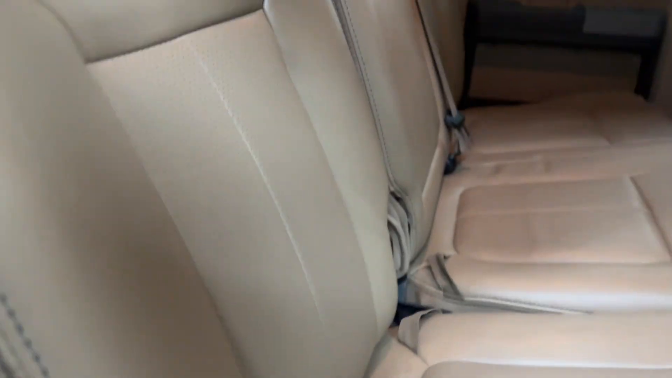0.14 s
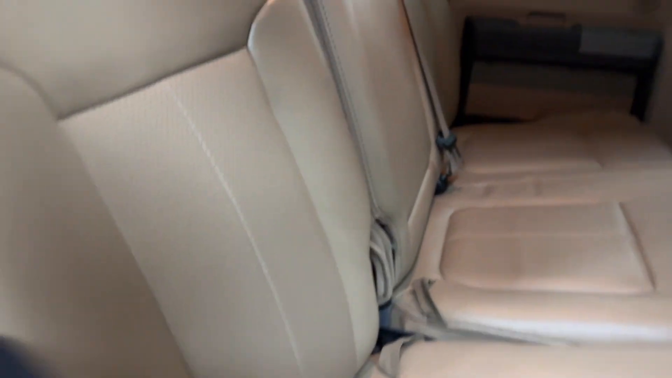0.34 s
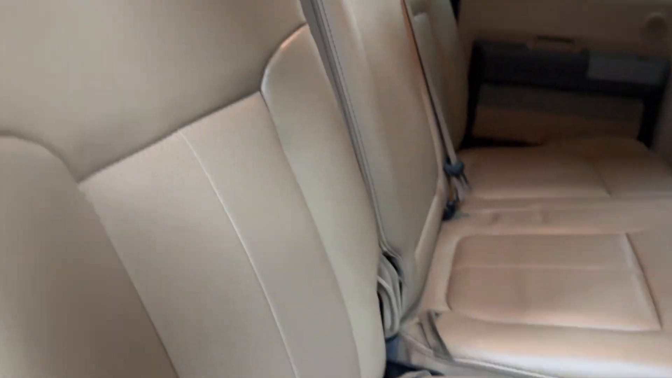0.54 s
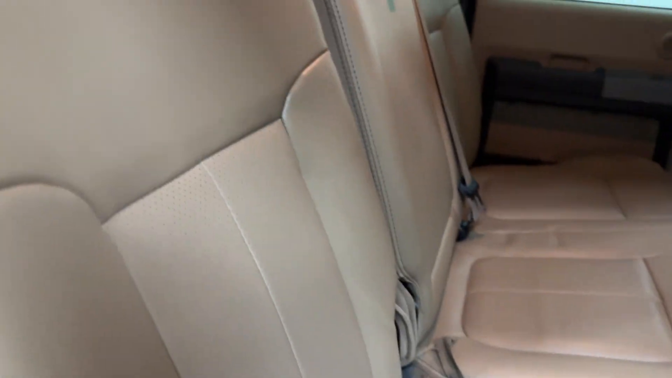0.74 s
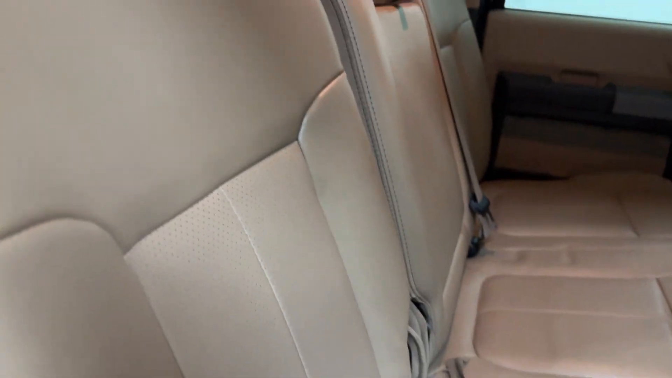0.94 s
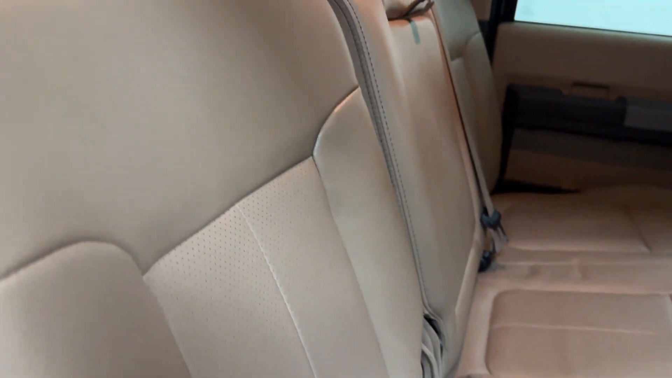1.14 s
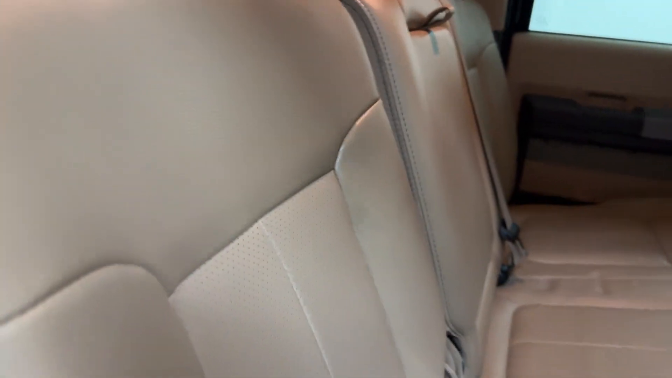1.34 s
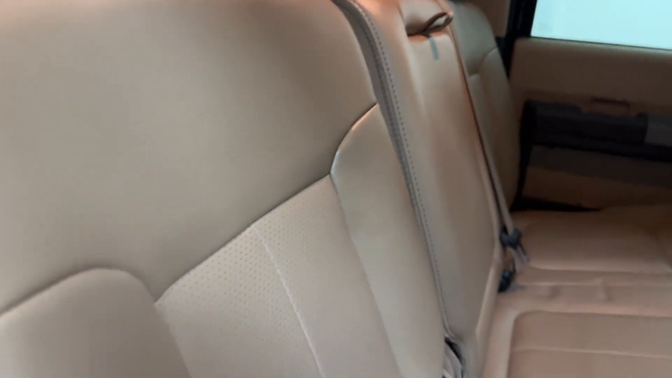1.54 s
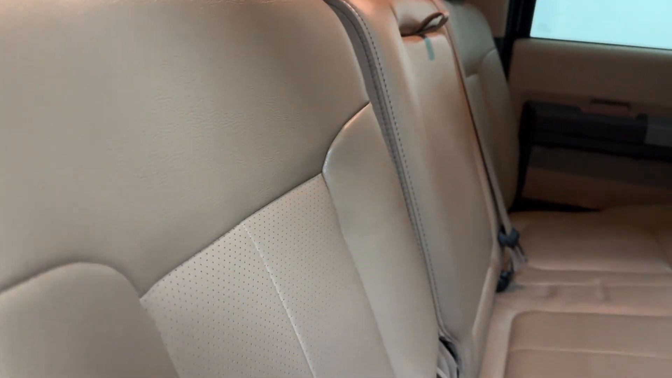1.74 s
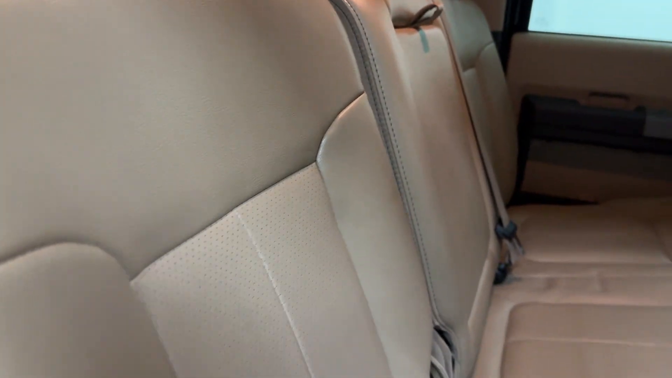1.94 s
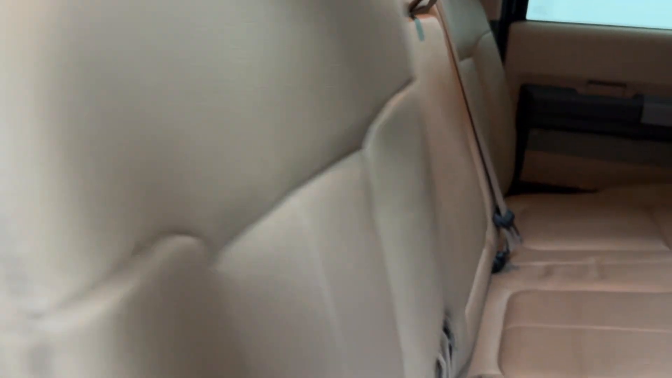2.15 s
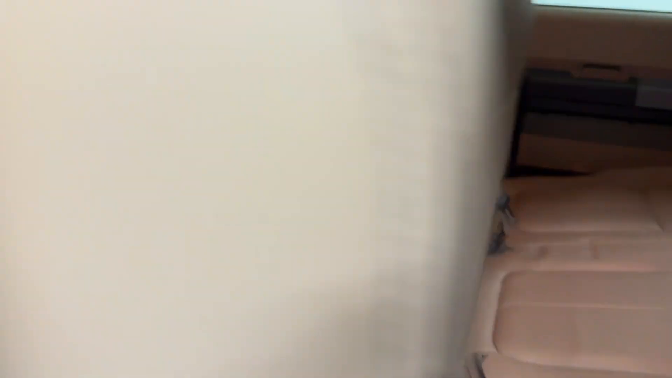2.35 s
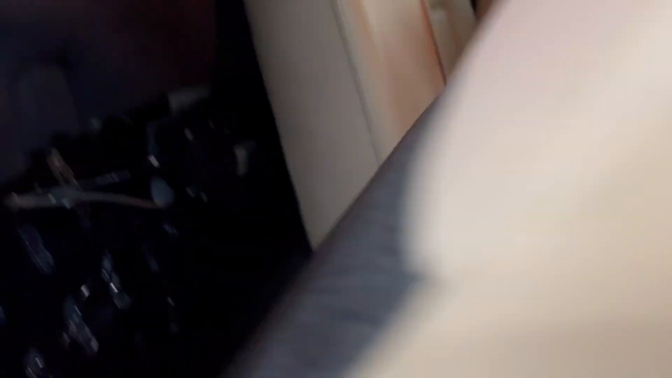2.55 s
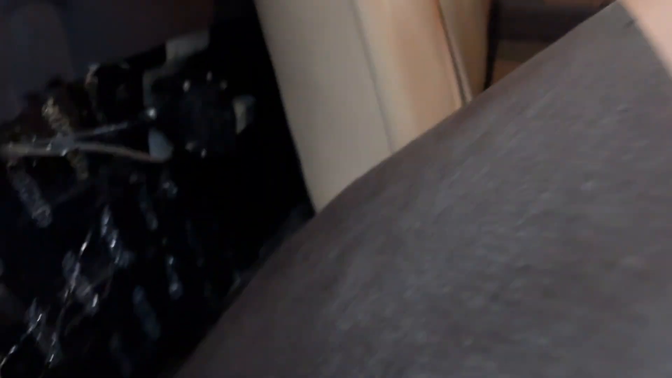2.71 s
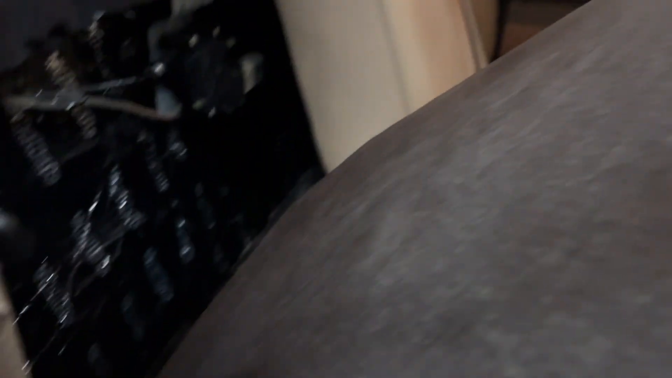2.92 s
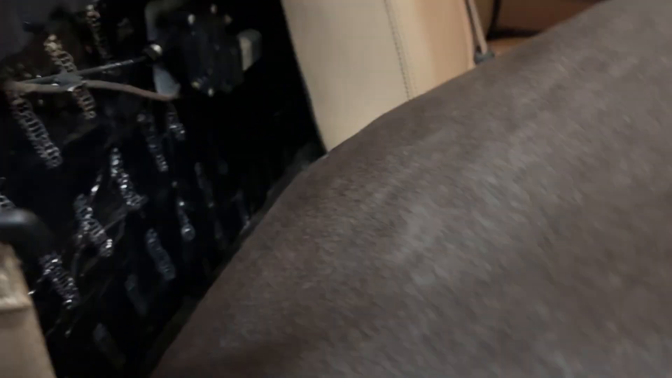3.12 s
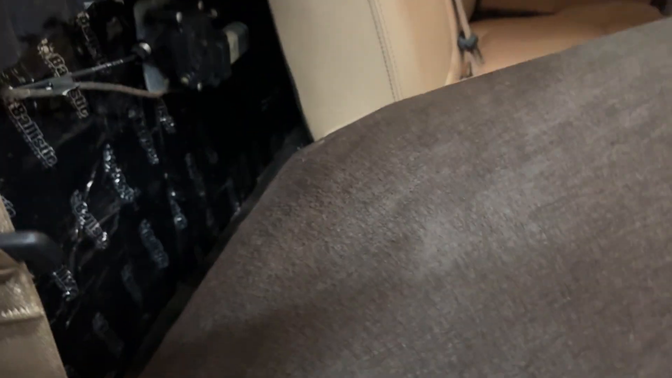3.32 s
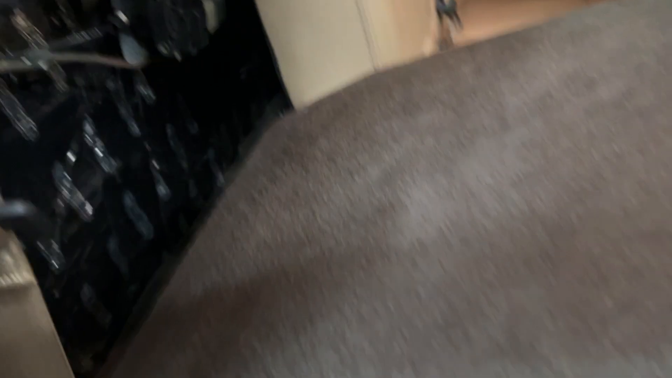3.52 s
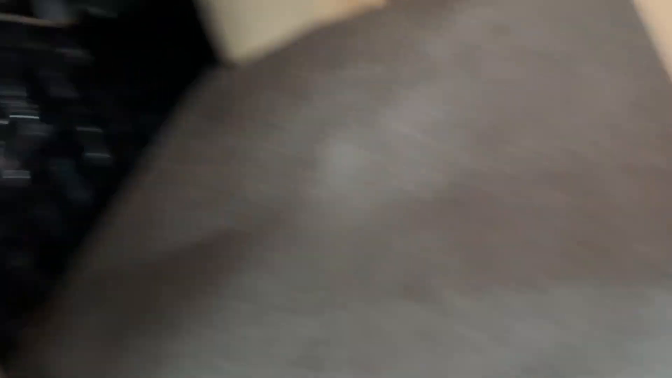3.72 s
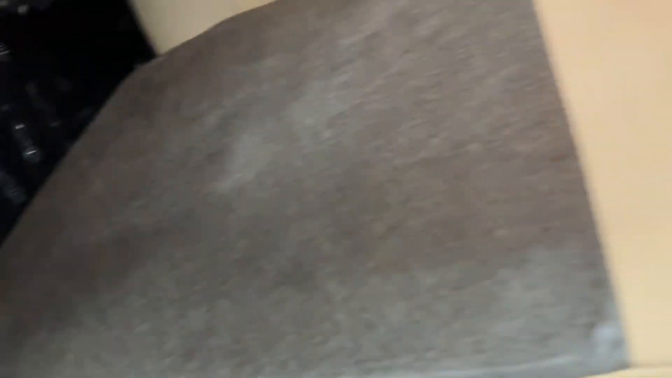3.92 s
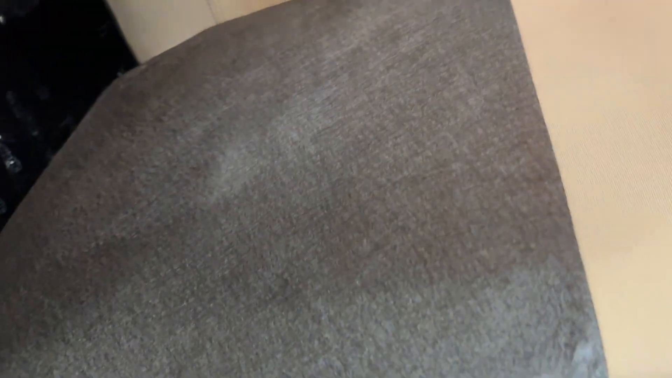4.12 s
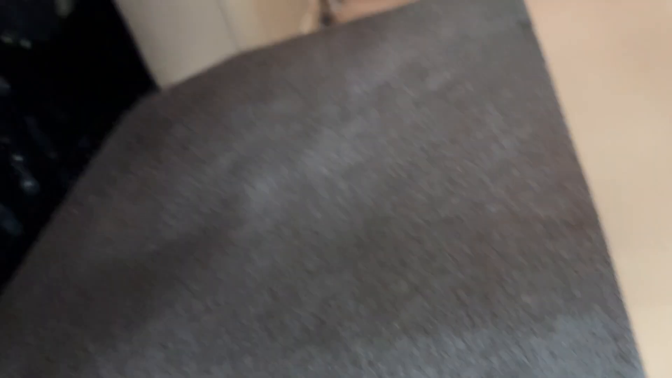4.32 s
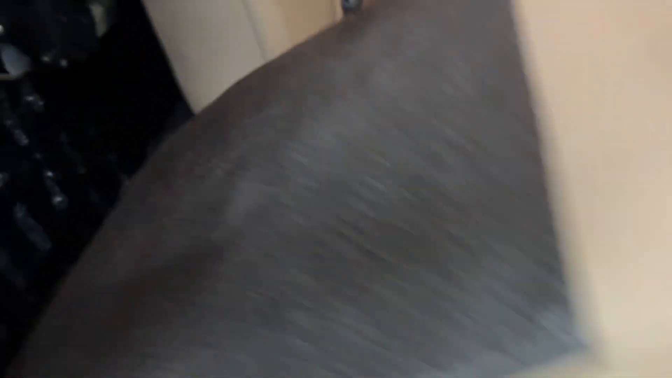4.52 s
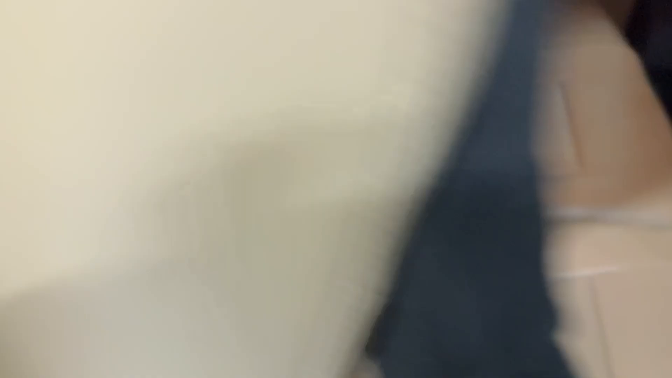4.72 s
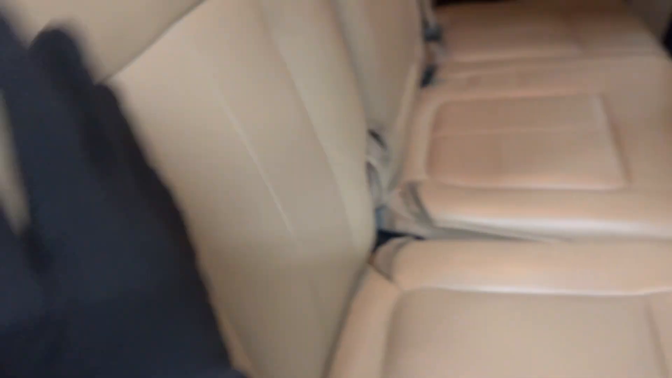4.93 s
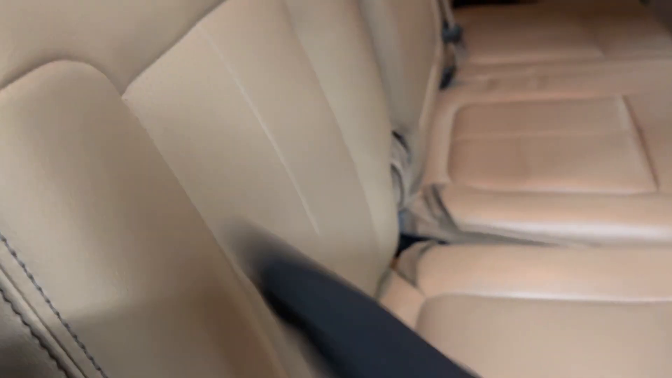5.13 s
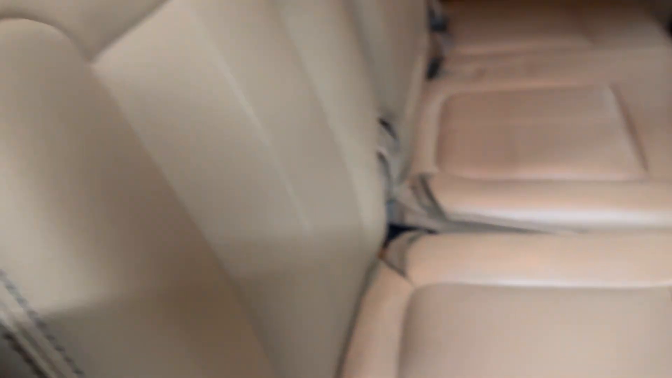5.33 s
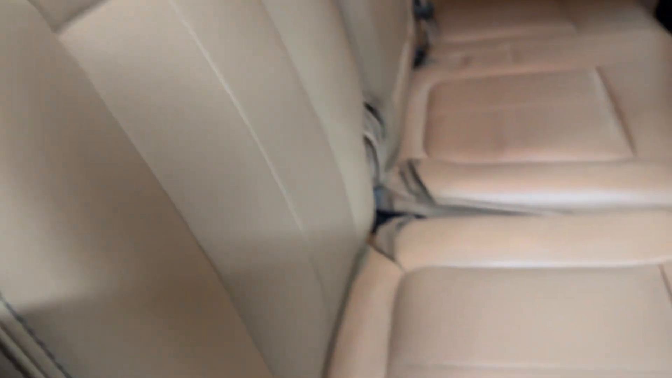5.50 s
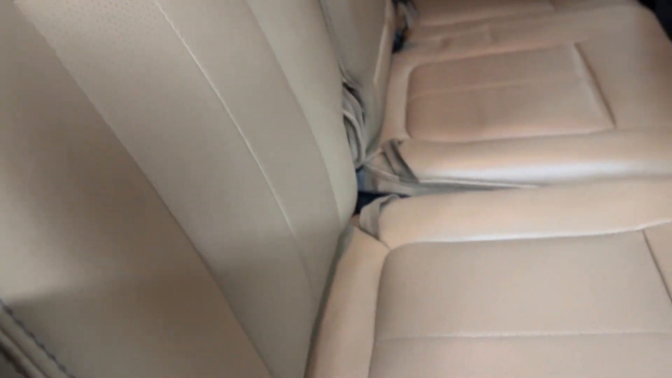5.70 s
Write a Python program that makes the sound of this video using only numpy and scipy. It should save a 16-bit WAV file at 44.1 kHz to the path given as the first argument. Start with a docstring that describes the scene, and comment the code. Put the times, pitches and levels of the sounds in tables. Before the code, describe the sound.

Clunky latch knocks and leather rustles in a truck cab, a hard clack and thud, a quiet lull, then one heavy booming slam.

```python
"""In the cab of a parked pickup, a leather seat back is released, folded down and slammed upright again.
Latch and frame knock as decaying modes struck by short contacts, and the padding thuds as a damped spring.
Hands and clothes rub the leather: shaped noise hisses, rustles, scuffs, creaks and scrapes.
The cab adds a short boom over muffled outdoor rumble; a hand-held phone close by takes the sound in stereo."""
import sys
import numpy as np
from scipy import signal
from scipy.fft import rfft, irfft
from scipy.io import wavfile
from scipy.ndimage import uniform_filter1d

SR = 44100
rng = np.random.default_rng(int(sys.argv[2]) if len(sys.argv) > 2 else 0)


def persist_wave(psi):
    """Save psi, clipped to +-1, as 16-bit WAV."""
    counts = np.round(np.clip(psi, -1, 1) * 32767).astype(np.int16)
    wavfile.write(sys.argv[1], SR, np.atleast_2d(counts).T)


N = 254016

# Knocks of latch and frame. Each row: start in seconds, level in dB, hollow shell knock in dB re level,
# bright tick in dB re level, crack centre in Hz, left minus right in dB (shell excepted), contact T60 in seconds.
KNOCKS = [(0.123, -68, 15.5, -27.5, 1150, 9, 0.04), (0.2895, -57.5, 5.5, -1.5, 2510, -5.5, 0.011),
          (.3351, -54, 6, 7, 2970, 1.5, 0.011), (.372, -42, 1.5, 7.5, 2340, 9, 0.0088),
          (0.4363, -24.5, -1, -5.5, 1707, -1, 0.01), (0.4491, -30.5, -3, -1, 1610, -1.5, 0.0061),
          (0.4802, -41, -12, 3, 1450, 5.5, 0.012), (0.5339, -26, -10, -5, 2035, -5, 0.0094),
          (0.6812, -42, 0.5, -1, 2610, -6, 0.023), (0.9787, -47.5, 7.5, -24.5, 1175, 9.5, 0.067),
          (1.023, -40.5, 2, -10, 1970, -9, 0.014), (1.1542, -37.5, -3, -7.5, 3830, 8, 0.042),
          (1.2259, -22, -1, -36, 1480, 3.5, 0.026), (1.409, -32.5, -2, -10, 3000, 7, 0.051),
          (1.6027, -27.5, -6.5, -3, 2320, 9, 0.022), (1.6374, -24, 0.5, -7.5, 1530, 7, 0.011),
          (1.7, -22, -12.5, -16, 1872, 2.5, 0.039), (1.9454, -30.5, -16, -23, 1015, -0.5, 0.052),
          (2.247, -41.5, 5.5, -4, 1125, 5, 0.024), (2.275, -39.5, -1.5, -10, 990, 7, .02),
          (2.3199, -9, -13, -3.5, 1937, 0, 0.023), (2.3212, -14, -5, -25, 4680, 3, 0.043),
          (2.571, -42, 16, -8, 1178, 5.5, 0.15), (2.576, -30, 9, -6.5, 1070, -13, 0.072),
          (2.583, -32, 12, -9, 1240, 15, 0.018), (2.593, -32, 7, -4.5, 1530, -3, 0.025),
          (2.6097, -33, -2, -21, 1110, 5, 0.015), (2.643, -37.5, 2.5, -22, 1000, -1, 0.016),
          (2.6743, -42, -6, -25, 1320, -4, 0.015), (2.849, -49.5, 3.5, -14, 1330, -3, 0.012),
          (2.8595, -52, -7.5, -22, 1340, 1.5, 0.011), (3.2284, -45, -6, -17, 1545, 8, 0.01),
          (3.2579, -41, -8, -15, 1728, 0.5, 0.019), (3.7629, -56.5, -14, -19.5, 2460, 10.5, 0.013),
          (3.7837, -56, 9.5, -9, 1208, 4.5, 0.038), (3.8592, -64.5, 2.5, 5, 2510, 12.5, 0.013),
          (3.8874, -53, 8, -10.5, 1480, -0.5, 0.0323), (4.0896, -68, 8, 5, 3480, 5, 0.017),
          (4.2438, -66.5, 15, -19, 1516, 10.5, 0.014), (4.3238, -54.5, 12, -25.5, 1480, 0.5, 0.019),
          (4.3374, -51.5, 3.5, -29, 1590, 1, 0.025), (4.3902, -52, -0.5, -24.5, 3300, 4.5, 0.03),
          (4.4422, -54, -19, -16, 2500, 13, 0.0174), (4.6127, -42, -1, -13, 1402, -3, 0.073),
          (4.6504, -41, -3, -8, 1223, 0.5, 0.042), (4.9594, -20.5, 8, -11.5, 1000, 14.5, 0.053),
          (4.9658, -4, -1, -8, 4100, 5, 0.02), (4.9968, -23, 8.5, -7, 3970, 3, 0.015),
          (5.0067, -20.5, 3, -16, 4270, -5, 0.014), (5.011, -15, -12, -33, 1500, 9, 0.015),
          (5.0106, -14.5, -23, -20, 4300, 3, 0.0086), (5.3225, -53, 14, -26, 1110, 0, .03),
          (5.4388, -48.5, -16, -20, 4142, 5, 0.022), (5.455, -45, -26, -9, 2480, 3, 0.013),
          (5.5116, -49, 6.5, -6, 3550, 2, 0.16), (5.651, -47, -22, -19, 1590, 0, 0.055)]
# Modes of the hollow seat shell. Each row: frequency in Hz, relative level in dB, T60 in seconds
# before the extra damping of each blow.
SHELL_MODES = [(175.4, -3.5, 0.13), (275, -1, 0.067), (398.5, -3, 0.15), (451, -4.5, 0.085),
               (626, -6, 0.021), (772, -14, 0.098)]
# Modes of the seat frame. Each row: frequency in Hz, relative level in dB, T60 in seconds.
FRAME_MODES = [(976, 3.5, 0.04), (1667, -2.5, 0.019), (2000, -11.5, 0.023), (2900, -8, 0.029),
               (3786, 0, 0.025), (4090, -11.5, 0.02), (4890, -6, 0.027), (6630, -11, 0.081)]
# Chance snaps of leather and trim: level re scuff, its scatter, middle crack pitch and contact T60.
SNAPS_PER_S, SNAP_DB, SNAP_SCATTER_DB, SNAP_HZ, SNAP_T60_S = 2.5, 11.5, 3, 1700, 0.01
# Soft thuds of the padded back and the boom of the cab after them.
# Each row: start in seconds, peak in dB, settled pitch in Hz, rise in seconds.
THUDS = [(0.374, -38.5, 100, 0.018), (0.45, -49, 111, .012), (.48, -33.5, 89.7, 0.017),
         (0.678, -38, 123, 0.0083), (1.23, -33, 104.7, 0.028), (1.642, -20, 92, 0.0097),
         (2.326, -24, 106, 0.01), (2.345, -21, 92.6, 0.012), (2.586, -10, 90.7, 0.0055),
         (2.599, -36, 33.5, 0.033), (2.61, -25, 60, 0.013), (4.985, -2, 78.8, 0.012),
         (5.0, -32, 35.8, 0.029), (5.008, -12.5, 66, 0.013), (5.065, -13, 61.8, .04),
         (5.189, -31.5, 70, 0.043), (5.271, -31, 68, 0.031), (5.362, -34, 63.2, 0.037)]
# The steel latch bar springs free, later snaps shut.
# Each row: start in seconds, level in dB, chatter spread in Hz, highest well-rung mode in Hz.
LATCH_BLOWS = [(2.322, -40, 349.5, 2592), (4.968, -42.5, 68.7, 5200)]
# Modes of the latch bar. Each row: frequency in Hz, relative level in dB, T60 in seconds.
LATCH_MODES = [(1243, -5, 0.27), (1413, -7, .4), (1800, -6, 0.83), (2150, -5.5, 1.2), (2244, -3, .8),
               (3280, -9.5, 0.53), (3790, -6, 1.1), (4300, -13.5, 0.84)]
# Strokes of hand and cloth over the seat. Each row: start, firmest moment and end in seconds,
# skin hiss, cloth rustle, cloth scuff and padding creak in dB, left minus right in dB.
STROKES = [(-.1, 0.0, .125, -59.5, -65, -66, -50.5, -2), (0.029, 0.224, 0.37, -66.5, -86.5, -75, -87, 13.5),
           (0.351, 0.418, .52, -53, -52.5, -50.5, -49.5, 0),
           (0.462, 0.536, .68, -55.5, -53.5, -51, -45.5, 4.5),
           (0.592, 0.716, 0.87, -60.5, -57, -58, -53.5, 8), (.78, 0.91, 1.04, -64.5, -60, -59, -55.5, 7.5),
           (0.967, 1.012, 1.035, -73, -71, -66, -43.5, 4), (1.0, 1.108, 1.85, -57.5, -56, -53, -51, 8.5),
           (1.18, 1.345, 1.45, -52.5, -53.5, -50, -42.5, 5.5),
           (1.378, 1.47, 1.527, -49, -59.5, -52.5, -46, 13.5), (1.51, 1.616, 1.737, -50, -53, -62, -52, 7),
           (1.72, 1.792, 1.97, -54.5, -58, -55.5, -54, 5.5), (1.85, 1.929, 2.02, -65, -62, -56, -56.5, 7),
           (1.948, 2.068, 2.2, -55.5, -60.5, -51, -47, 7), (2.14, 2.206, 2.28, -49.5, -58, -50.5, -55, 8),
           (2.21, 2.282, 2.343, -45, -52.5, -52, -53, 5.5), (2.33, 2.391, 2.7, -67, -60.5, -57.5, -53, 3.5),
           (2.589, 2.629, 2.69, -65, -67, -61.5, -51, 7), (2.651, 2.706, 2.745, -66, -58.5, -58, -58, -1.5),
           (2.719, 2.773, 2.84, -63.5, -62.5, -66, -57, 1.5),
           (2.759, 3.048, 3.27, -70.5, -74.5, -69, -62, 5), (3.093, 3.188, 3.43, -65, -67, -65.5, -57.5, 3),
           (3.36, 3.721, 4.1, -83, -83.5, -73, -69, 1), (4.305, 4.322, 4.45, -79.5, -81.5, -70, -54.5, 7.5),
           (4.381, 4.548, 4.84, -74, -78.5, -70, -65, 5.5), (4.537, 4.666, 5.17, -56, -58, -59, -51, 2.5),
           (4.676, 4.83, 4.93, -49.5, -56, -49, -41.5, 3),
           (4.829, 4.959, 5.04, -47.5, -52.5, -45.5, -37.5, 5.5),
           (4.98, 5.03, 5.2, -56, -51.5, -56, -54, 3.5),
           (5.099, 5.236, 5.58, -72.5, -60, -60.5, -56.5, 5.5),
           (5.48, 5.524, 5.63, -64, -76, -64, -54, 5.5), (5.564, 5.674, 5.74, -60.5, -64, -63, -66, 4),
           (5.682, 5.752, 5.9, -58.5, -68, -58.5, -55, 3)]
STROKE_POINTED = 1.22  # exponent: higher = a stroke swells and fades more sharply
# A hand that only holds on. The entries: hiss, rustle, scuff and creak in dB.
RESTING_DB = [-95, -90.5, -81.5, -68.5]
# Spectra of skin hiss, cloth rustle, cloth scuff and padding creak.
# Each row: frequency in Hz, relative level in dB per Hz.
HISS_SPECTRUM = [(3500, -21.5), (5500, -3), (7500, -3.5), (10500, -2), (14500, -7.5), (16000, -11)]
RUSTLE_SPECTRUM = [(1300, -21.5), (2300, -1.5), (3500, 0), (5000, -4.5), (8000, -20.5)]
SCUFF_SPECTRUM = [(500, -16), (900, -2), (1300, -6.5), (2000, -7), (4000, -20)]
CREAK_SPECTRUM = [(120, 0), (250, 0), (400, -1), (700, -8.5), (1400, -20), (3000, -45.5)]
# Leather dragging on leather. Each row: start and end in seconds, first and last pitch in Hz, level in dB.
SCRAPES = [(1.969, 2.104, 1350, 1203, -46), (4.66, 4.8, 1389, 1100, -48), (4.78, 4.95, 1050, 850, -49)]
SCRAPE_WIDTH_HZ, SCRAPE_GRAIN_DB = 650, 0.5
# Heavy blows after which padding and cab body shudder on. Each row: start in seconds, level in dB.
SHUDDERS = [(1.23, -52), (1.64, -46.5), (2.33, -43.5), (2.59, -46), (4.979, -24.5)]
CREAK_RISE_S, CREAK_T60_S = 0.02, 0.79
BODY_RISE_S, BODY_T60_S, BODY_DB = 0.037, 1, 9.5  # level re the shuddering creak
CAB_T60_S, CAB_DB = 0.099, -11
# Spectrum of the cab body. Each row: frequency in Hz, relative level in dB per Hz.
BODY_SPECTRUM = [(22, -30), (35, -10.5), (60, 4), (90, 0), (140, -9.5), (220, -16.5), (400, -26)]
OUTDOORS_DB, OUTDOORS_SWELL_DB = -51, 1.5  # rumble at rest and its slow swell
LEANING_DB = -0.5  # rumble re creak of a stroke
# Spectrum of the still air. Each row: frequency in Hz, relative level in dB per Hz.
STILL_SPECTRUM = [(88, -35), (150, -3.5), (1210, -30.5), (1450, -40.5), (2100, -33), (3290, -49),
                  (7180, -51), (9260, -38), (12400, -57), (14500, -72.5), (16000, -65)]
STILL_DB = -63.5
# The phone: start of the shared treble, lag of its left side in samples, upper limit.
SPLIT_HZ, PORT_LAG, TOP_HZ = 7000, 14, 16000


def undb(db):
    """Decibels are logarithmic: the amplitude gain of a level in dB."""
    return 10 ** (np.asarray(db) / 20)


def walk(rate):
    """Low-passed random steps: levels held 1 / rate s and slewed twice, with a spread near 1."""
    hold = int(SR / rate)
    steps = np.repeat(rng.standard_normal(N // hold + 1), hold)
    return 0.85 * uniform_filter1d(uniform_filter1d(steps, hold), hold)[:N]


def sides(pan_db):
    """Interaural level difference: left and right gains that share it equally."""
    return undb(np.array([pan_db, -pan_db]) / 2)


def band(x, lo_hz, hi_hz):
    """Gentle second-order band-pass, scaled to peak 1."""
    sos = signal.butter(2, [lo_hz, min(hi_hz, 0.45 * SR)], "band", fs=SR, output="sos")
    y = signal.sosfilt(sos, x)
    return y / np.abs(y).max()


def dying(modes, t):
    """Damped free vibration: one row for each mode, as a dying complex swing."""
    hz, db, t60 = np.transpose(modes)[:, :, None]
    return undb(db) * np.exp((2j * np.pi * hz - np.log(1000) / t60) * t)


def coloured(spectrum, alike_hz, flicker_db, grain_db):
    """Spectrally shaped stereo noise of rms 1: grainy, flickering by octave, alike at both ears in the bass."""
    hz = np.maximum(np.fft.rfftfreq(N, 1 / SR), 1)
    points, db = np.transpose(spectrum)
    colour = undb(np.interp(np.log(hz), np.log(points), db, left=-80, right=-80))
    grains = undb(grain_db * (walk(500) + walk(60)))
    mid, side = rfft(rng.standard_normal((2, N)) * grains) * colour
    pair = mid + side * np.minimum(hz / alike_hz, 1) * np.array([[1], [-1]])
    out = 0
    octaves = 32 * 2. ** np.arange(10)
    for centre in octaves[(octaves > points[0] / 2) & (octaves < 2 * points[-1])]:
        share = np.cos(np.pi / 2 * np.clip(np.log2(hz / centre), -1, 1)) ** 2
        out = out + irfft(pair * share, N) * undb(flicker_db * walk(28))
    return out / np.sqrt(np.mean(out ** 2))


def knocks(blows):
    """Impact excitation: a short rough contact cracks, ticks and rings the modes of frame and shell."""
    size = 8192
    out = np.zeros((2, N + size))
    t = np.arange(size) / SR
    hz = np.maximum(np.fft.rfftfreq(size, 1 / SR), 20)
    # low tones of a knock arrive late: each lags by the same number of cycles
    late = np.exp(-2j * np.pi * 1.602 * np.log(np.minimum(hz / 1200, 1)))
    frame_modes, shell_modes = dying(FRAME_MODES, t), dying(SHELL_MODES, t)
    fade = np.cos(np.pi / 2 * t / t[-1])
    for start, db, hollow_db, tick_db, centre_hz, pan_db, t60 in blows:
        noise = rng.standard_normal((3, size))  # left, right, common
        turn = np.exp(2j * np.pi * rng.random((3, len(FRAME_MODES))))  # random phases
        contact = np.exp(-np.log(1000) * t / t60) * (1 - np.exp(-t / (0.02 * t60)))
        # a blow favours the modes near its own pitch
        near = np.exp(-(np.log2(hz / centre_hz) / 0.42) ** 2)
        shell = (turn[2, :len(SHELL_MODES)] @ shell_modes).imag
        shell = irfft(rfft(shell * np.exp(-t / (0.5 * t60 + 0.0059))) * late)
        hollow = undb(hollow_db) * shell / np.abs(shell).max()
        tick = undb(tick_db) * band(noise[2] * contact, 1700, 12500)
        first = int(start * SR)
        for ear in range(2):
            ring = (turn[ear] @ frame_modes).imag * (1 - np.exp(-t / 0.0018))
            frame = irfft(rfft(ring) * near)
            rough = (noise[ear] + 0.64 * noise[2]) * contact
            crack = band(rough, centre_hz / 2.47, centre_hz * 1.26)
            hard = 0.77 * crack + 0.42 * frame / np.abs(frame).max() + tick
            sound = sides(pan_db)[ear] * hard + hollow
            out[ear, first:first + size] += undb(db) * sound * fade
    return out[:, :N]


def snaps(scuff):
    """Random point process of small snaps, as knock rows: denser and louder under firmer rubbing."""
    count = int(SNAPS_PER_S * N / SR)
    rubbed = np.cumsum(scuff)
    when = np.searchsorted(rubbed, rng.random(count) * rubbed[-1])
    rows = []
    for i, (a, b, c) in zip(when, rng.standard_normal((count, 3))):
        db = 20 * np.log10(scuff[int(i)]) + SNAP_DB + SNAP_SCATTER_DB * a
        rows.append((i / SR, db, -8, -14, SNAP_HZ * 1.41 ** b, 4 + 5 * c, SNAP_T60_S))
    return rows


def thuds():
    """Damped spring: foam squeezed by the blow swings a few times, dropping in pitch as it settles."""
    out, t = np.zeros(N + SR), np.arange(SR) / SR
    for start, db, hz, rise in THUDS:
        cycles = hz * (t + 0.56 * rise * (1 - np.exp(-t / rise)))
        swell = (t / rise * np.exp(1 - t / rise)) ** 2
        first = int(start * SR)
        out[first:first + SR] += undb(db) * swell * np.sin(2 * np.pi * cycles)
    return out[:N]


def latch():
    """Modulated resonance: the bar rings on while chatter in its guide smears every mode, widely when loose."""
    out, t = np.zeros((2, N + SR)), np.arange(SR) / SR
    for start, db, spread_hz, top_hz in LATCH_BLOWS:
        span = int(SR / spread_hz)
        noise = rng.standard_normal((2, 2, len(LATCH_MODES), SR))
        chatter = uniform_filter1d(noise, span) * np.sqrt(span)
        modes = dying(LATCH_MODES, t) / (1 + (np.array(LATCH_MODES)[:, :1] / top_hz) ** 6)
        ring = (chatter[0] * modes.real + chatter[1] * modes.imag).sum(axis=1)
        first = int(start * SR)
        out[:, first:first + SR] += undb(db) * ring
    return out[:, :N]


def strokes():
    """Power addition of strokes that swell and fade: gains of hiss, rustle, scuff, creak, then pan in dB."""
    t = np.arange(N) / SR
    power, lean = undb(RESTING_DB)[:, None] ** 2 * np.ones(N), np.zeros(N)
    for start, firm, end, *levels_db, pan_db in STROKES:
        span = slice(max(int(start * SR), 0), int(end * SR))
        course = np.interp(t[span], [start, firm, end], [0, 1, 2])
        press = np.abs(np.sin(np.pi / 2 * course)) ** (2 * STROKE_POINTED)
        added = undb(levels_db)[:, None] ** 2 * press
        power[:, span] += added
        lean[span] += pan_db * added[2]  # pan weighted by scuff power
    return (*np.sqrt(power), lean / power[2])


def rubbing(hiss, rustle, scuff, creak, pan_db):
    """Friction noise: sliding skin hisses, cloth rustles and scuffs in grains, squeezed padding creaks."""
    creak = np.hypot(creak, shudder(CREAK_RISE_S, CREAK_T60_S))
    skin = hiss * coloured(HISS_SPECTRUM, 3000, flicker_db=1.5, grain_db=1.5)
    cloth = (rustle * coloured(RUSTLE_SPECTRUM, 1100, flicker_db=4.0, grain_db=2.0)
             + scuff * coloured(SCUFF_SPECTRUM, 900, flicker_db=2.0, grain_db=2.5))
    padding = creak * coloured(CREAK_SPECTRUM, 400, flicker_db=3.0, grain_db=1.5)
    return skin + cloth * sides(pan_db) + padding * sides(0.69 * pan_db)


def scrapes():
    """Stick-slip friction excites one broad resonance that sinks as the leather slides."""
    out, span = np.zeros((2, N)), int(SR / SCRAPE_WIDTH_HZ)
    grains = undb(SCRAPE_GRAIN_DB * walk(460))
    for start, end, from_hz, to_hz, db in SCRAPES:
        first, size = int(start * SR), int((end - start) * SR)
        phase = 2 * np.pi * np.cumsum(np.geomspace(from_hz, to_hz, size)) / SR
        noise = rng.standard_normal((2, 2, SR))
        slip = uniform_filter1d(uniform_filter1d(noise, span), span)[..., :size] * np.sqrt(span)
        tone = slip[0] * np.cos(phase) + slip[1] * np.sin(phase)
        out[:, first:first + size] += undb(db) * np.sqrt(np.hanning(size)) * tone
    return out * grains * sides(4.5)[:, None]


def shudder(rise, t60):
    """Exponential decay of stored energy: a gain that swells after every heavy blow and dies away."""
    t = np.arange(N) / SR
    gain = np.zeros(N)
    for start, db in SHUDDERS:
        age = np.maximum(t - start, 0)
        gain += undb(db - 60 * age / t60) * (1 - np.exp(-age / rise))
    return gain


def cab(x):
    """Reverberation as convolution: short, well damped reflections off glass, seats and roof lining."""
    t = np.arange(SR // 4) / SR
    decay = np.exp(-np.log(1000) * t / CAB_T60_S) * (1 - np.exp(-t / 0.003))
    tail = signal.lfilter([1], [1, -0.6], rng.standard_normal((2, len(t))) * decay)
    tail = tail / np.sqrt(np.sum(tail ** 2, 1, keepdims=True))
    return signal.fftconvolve(x, tail, axes=1)[:, :N]


def rumble(creak):
    """Structure-borne sound: the cab body hums with outdoor rumble, more when leaned on or after a blow."""
    outdoors = undb(OUTDOORS_DB + OUTDOORS_SWELL_DB * walk(6.8))
    leaning = undb(LEANING_DB) * creak
    shaken = undb(BODY_DB) * shudder(BODY_RISE_S, BODY_T60_S)
    gain = np.sqrt(outdoors ** 2 + leaning ** 2 + shaken ** 2)
    return gain * coloured(BODY_SPECTRUM, 570, flicker_db=4.0, grain_db=0.5)


def still_air():
    """Background noise floor: faint shaped noise of constant mean level."""
    return undb(STILL_DB) * coloured(STILL_SPECTRUM, 710, flicker_db=4.5, grain_db=-1.0)


def scene():
    """Superposition: handling sounds in the cab over its rumble and still air."""
    hiss, rustle, scuff, creak, pan_db = strokes()
    hits = knocks(KNOCKS + snaps(scuff))
    handling = latch() + thuds() + rubbing(hiss, rustle, scuff, creak, pan_db) + scrapes()
    return hits + undb(CAB_DB) * cab(hits) + handling + rumble(creak) + still_air()


def record(dry):
    """Crossover and delay: the phone's treble comes from one port, later and inverted on the left; top cut."""
    low = signal.sosfiltfilt(signal.butter(8, SPLIT_HZ, fs=SR, output="sos"), dry)
    treble = (dry - low)[0]
    out = low + np.array([-np.roll(treble, PORT_LAG), treble])
    return signal.sosfilt(signal.ellip(8, 0.2, 70, TOP_HZ, fs=SR, output="sos"), out)


dry = scene()
out = record(dry)
persist_wave(out)
```